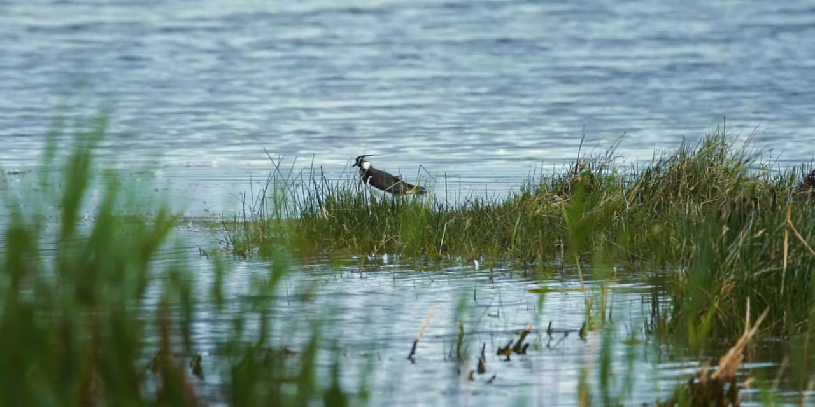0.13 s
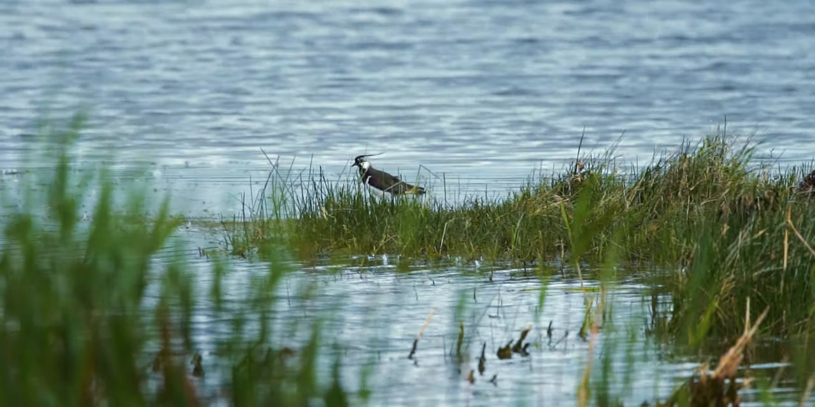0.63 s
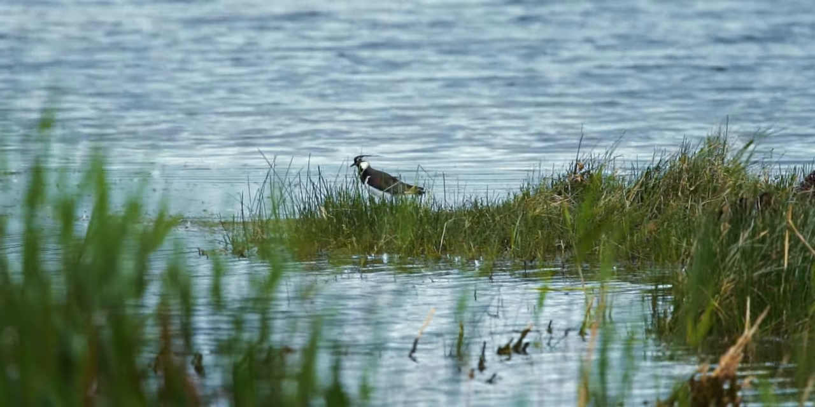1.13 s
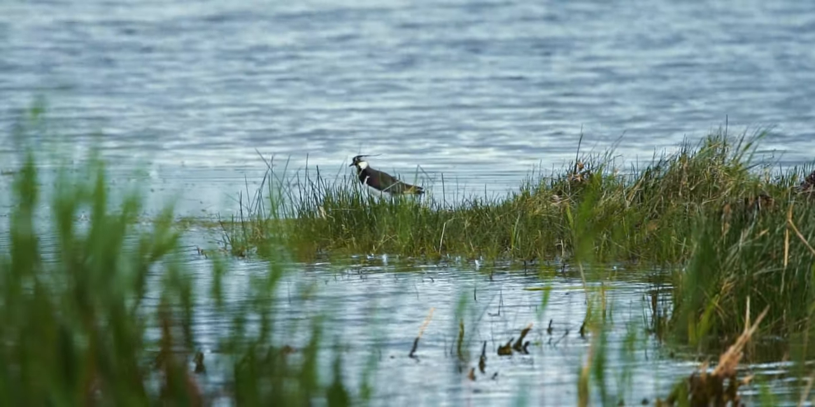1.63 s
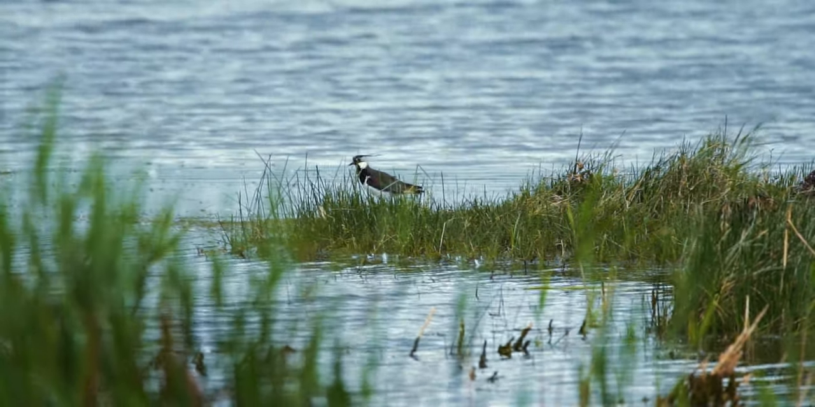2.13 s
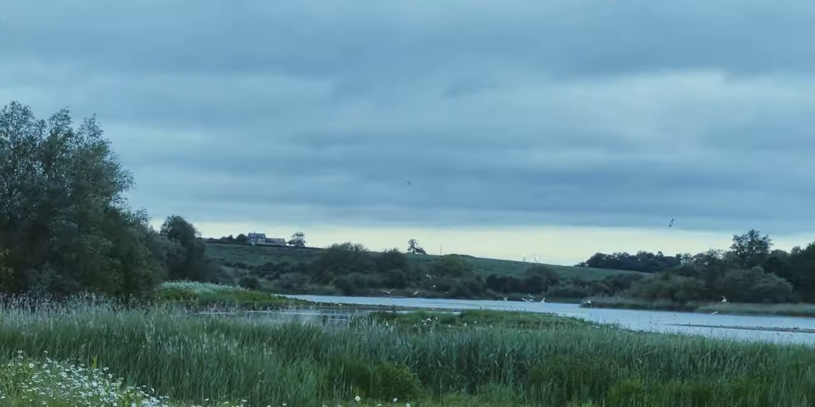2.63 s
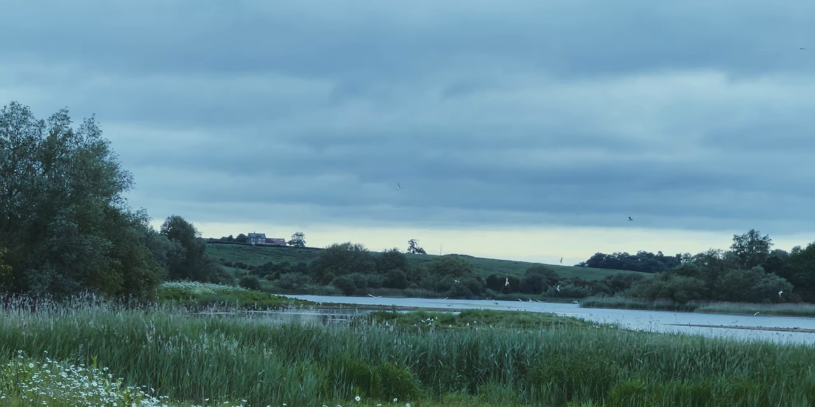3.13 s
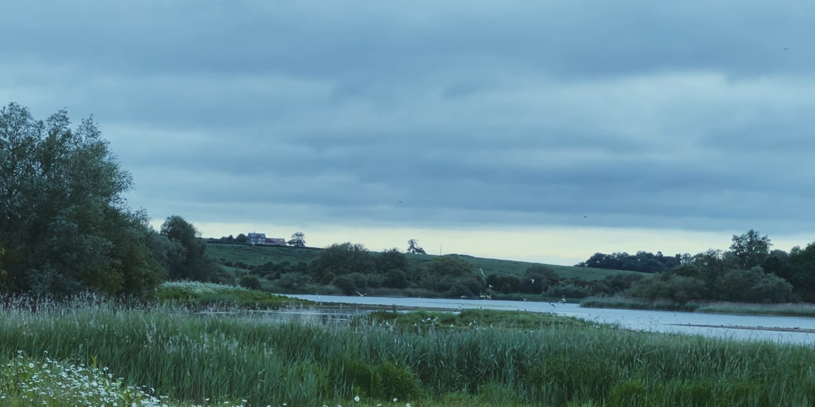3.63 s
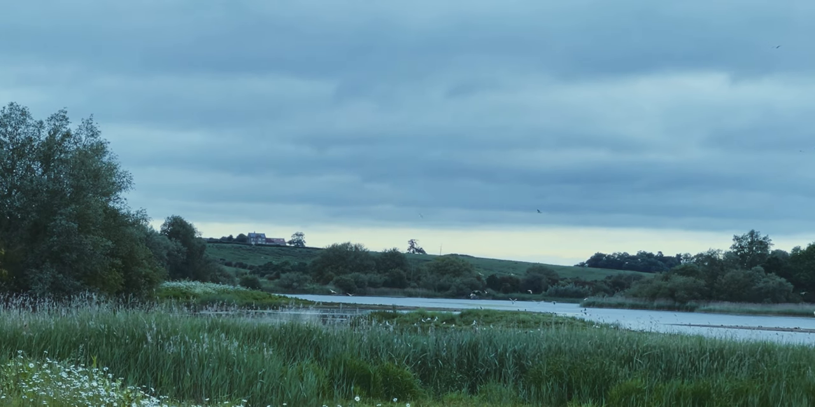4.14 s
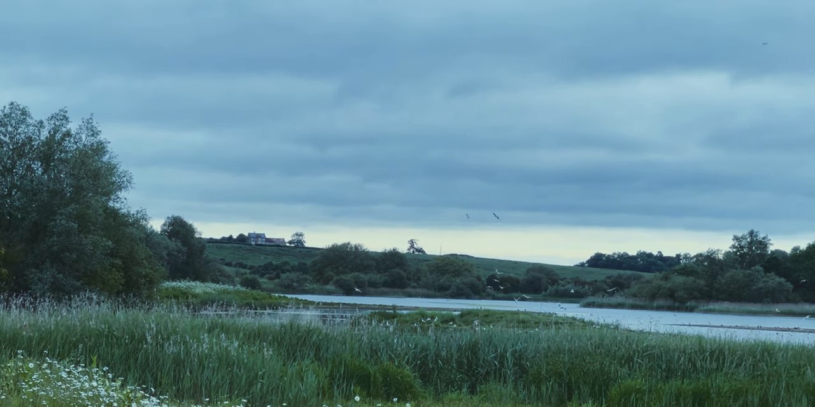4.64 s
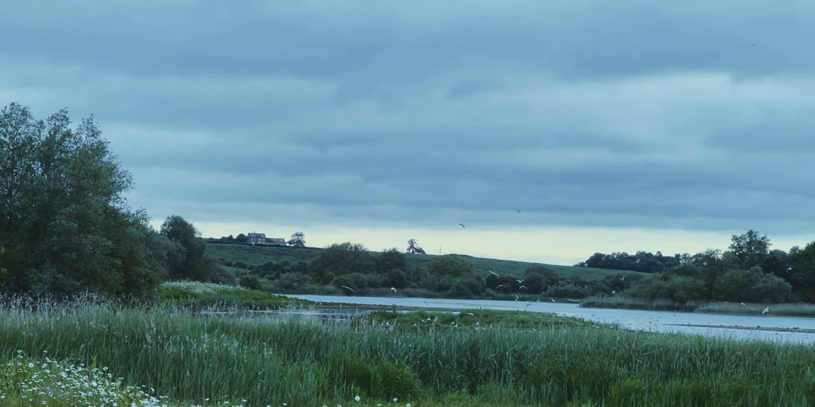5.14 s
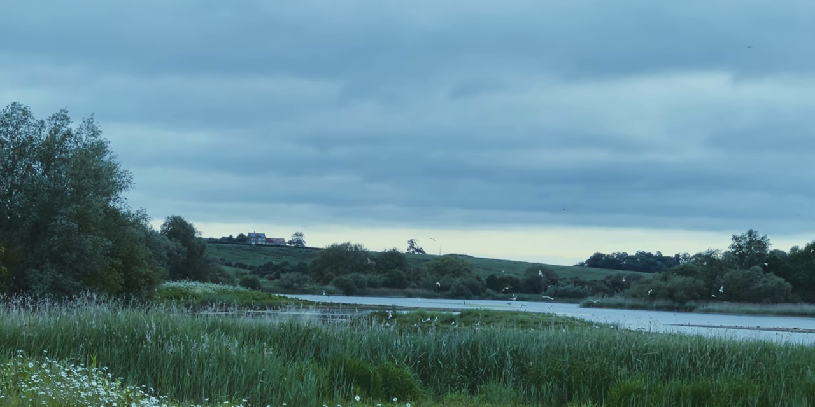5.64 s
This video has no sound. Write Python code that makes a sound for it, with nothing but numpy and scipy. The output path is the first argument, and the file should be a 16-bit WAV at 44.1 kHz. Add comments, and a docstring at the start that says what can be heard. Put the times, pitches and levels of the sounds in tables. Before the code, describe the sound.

Outdoors at a reedy lakeside, a soft steady rustle lies under a distant gull colony's raspy cries. A nearby wren begins faintly, then delivers a falling trill, a very fast rattle and a loud slower trill. Thin high seeps and warbles from other birds join in. Low gusts buffet the stereo camera microphone more in the second half.

```python
"""Breezy marsh with a singing wren

A camera's two microphone ports hear gusts, as lumps of low noise, over the steady rustle of shaped noise.
A gull colony rasps far over the water, its gliding harmonics throbbed and smeared; a treble wash is chatter.
A wren sings close by in gliding sine notes: whistles, slurs, hooks and three trills.
Other songbirds add thin seeps and warbles, sine glides that waver or buzz."""
import sys
import numpy as np
from scipy import signal
from scipy.fft import rfft, irfft
from scipy.io import wavfile
from scipy.ndimage import uniform_filter1d

SR = 44100
rng = np.random.default_rng(int(sys.argv[2]) if len(sys.argv) > 2 else 0)


def boost(x):
    """Linear amplitude factor 10**(x/20) for a level x in decibels (scalar or array-like)."""
    u = np.asarray(x, float) / 20
    return 10 ** u


def store_pcm(level_fs):
    """Save levels as 16-bit WAV."""
    pcm = np.round(np.clip(level_fs, -1, 1) * 32767).astype(np.int16)
    wavfile.write(sys.argv[1], SR, np.atleast_2d(pcm).T)


N = 254456  # samples in the scene


def walk(rate):
    """Random levels held 1 / rate s and slewed twice; spread near 1."""
    hold = max(int(SR / rate), 1)
    steps = np.repeat(rng.standard_normal(N // hold + 1), hold)
    return 1.3 * uniform_filter1d(uniform_filter1d(steps, hold), hold)[:N]


def curve(rows):
    """Gain over time through (t/s, level/dB) rows."""
    s, db = np.transpose(rows)
    return boost(np.interp(np.arange(N) / SR, s, db))


def shape(points):
    """Gain at every frequency through (f/Hz, level/dB) points, joined on a log pitch scale."""
    hz, db = np.transpose(points)
    bins_hz = np.fft.rfftfreq(N, 1 / SR)
    return boost(np.interp(np.log(bins_hz + 1), np.log(hz + 1), db))


def noise(gain):
    """Fresh noise with the given gain per frequency."""
    return irfft(rfft(rng.standard_normal(N)) * gain, N)


def unit(x):
    """Scale to rms 1."""
    return x / np.sqrt(np.mean(x ** 2))


def add(out, rows, pan_db, flutter, voice=((1, 0),), lag=0., fade=0.0037):
    """One note along (t/s, f/Hz, level/dB) rows; the left port's phase runs lag samples late.

    voice: (multiple of the pitch, level/dB); pan_db: left minus right; fade: s beyond either end."""
    s, hz, db = np.transpose(rows)
    first = max(int((s[0] - fade) * SR), 0)
    i = np.arange(first, min(int((s[-1] + fade) * SR), N))
    t = i / SR
    pitch = np.interp(t, s, hz)
    edge = np.clip(np.minimum(t - s[0], s[-1] - t) / fade + 1, 0, 1) ** 2
    size = np.sqrt(2) * boost(np.interp(t, s, db)) * edge * flutter[i]
    pan = boost(np.interp(t, s, pan_db * np.ones_like(s)) / 2)
    phase = 2 * np.pi * np.cumsum(pitch) / SR
    for side, (gain, late) in enumerate([(pan, lag), (1 / pan, 0)]):
        turn = phase - late * 2 * np.pi * pitch / SR
        tone = sum(boost(d) * np.sin(k * turn) for k, d in voice)
        out[side, i] += 2 * gain / (pan + 1 / pan) * size * tone


def note(s, length, first_hz, last_hz, db, style):
    """(t/s, f/Hz, level/dB) rows of a glide that swells to its peak and fades.

    style: (share of the length at the peak, start/dB, end/dB, bend of the glide; 1 = straight)."""
    peak, start_db, end_db, bend = style
    u = np.linspace(0, 1, num=13)
    hz = first_hz + (last_hz - first_hz) * u ** bend
    swell_db = np.interp(u, [0, np.clip(peak, .01, .99), 1], [start_db, 0, end_db])
    return np.transpose([s + length * u, hz, db + swell_db])


def echo(x, t60, gap, db, width):
    """Reeds and trees scatter sound back: a noise tail that rises over gap s, then fades 60 dB per t60 s."""
    # tint of the scattered sound: f/Hz, level/dB
    echo_colour = [(1000, 7.5), (3500, 1), (5200, -3.5), (6500, 4), (8000, 3.5)]
    t = np.arange(int(.8 * SR)) / SR
    fall = np.exp(-np.log(1000) * t / t60) * np.clip(t / gap, 0, 1)
    mid, side = rng.standard_normal((2, len(t))) * fall / np.sqrt(np.sum(fall ** 2))
    tinted = irfft(rfft(x) * shape(echo_colour), N)
    left = signal.fftconvolve(tinted[0], mid + width * side)[:N]
    right = signal.fftconvolve(tinted[1], mid - width * side)[:N]
    return boost(db) * np.array([left, right])


def air():
    """Steady rustle of reeds, water and far land: shaped noise that spreads wider as time passes."""
    # colour of the rustle: f/Hz, level/dB
    air_colour = [(80, -4), (150, -4), (270, 0), (500, -2.5), (970, -7), (1430, -10.5), (2400, -13),
                  (3450, -24.5), (5400, -38.5), (7000, -33), (9000, -36), (11000, -38.5), (13500, -41.5),
                  (16500, -42.5)]
    # its spread by pitch: f/Hz, side minus mid level/dB
    air_side = [(60, -10.5), (125, -11.5), (320, -12), (560, -5), (970, -3.5), (1690, -11), (2950, -13.5),
                (5140, -1), (8000, 0.5), (10000, 2), (15000, -11)]
    # its spread over time: t/s, gain of the side/dB
    air_width = [(0, -12), (.3, -9), (.6, -12.5), (1.5, -4.5), (3, 3.5), (5.77, 2)]
    mid = noise(shape(air_colour))
    side = noise(shape(air_colour) * shape(air_side)) * curve(air_width)
    # the level is set by the rms of the part below 1400 Hz
    hz = np.fft.rfftfreq(N, 1 / SR)
    low = irfft(rfft(mid) * (hz < 1400), N)
    level = boost(-59 + 0.83 * walk(2.796)) / np.sqrt(np.mean(low ** 2))
    return (mid + side * np.array([[1], [-1]])) * level


def wind():
    """Gusts buffet both ports nearly alike, in lumps of low noise; once there is a soft falling knock."""
    # swell of the gusts: t/s, level/dB
    gusts = [(0.0, -53.5), (0.51, -52), (0.69, -57.5), (2.52, -53), (2.67, -52), (2.89, -44.5), (3.31, -50),
             (3.39, -41.5), (3.61, -49), (3.65, -41), (3.86, -53), (3.89, -43.5), (3.97, -50), (4.0, -41.5),
             (4.19, -40), (4.53, -54.5), (5.22, -41), (5.77, -45.5)]
    # rumble of the gusts: f/Hz, level/dB
    gust_colour = [(8.8, -52), (15, 0.5), (32, -4.5), (48, -1), (145, -17), (184, -26.5), (300, -31),
                   (390, -52), (660, -120)]
    # soft low knock: t/s, f/Hz, level/dB
    thump = [(.514, 210, -62), (0.52, 159.7, -48.5), (.53, 90, -47.5), (.545, 54.7, -47), (.562, 45, -57)]
    mid = unit(noise(shape(gust_colour)))
    side = unit(noise(shape(gust_colour) * shape([(20, -6), (100, 3.5)])))
    out = curve(gusts) * (mid + boost(-27.5) * side * np.array([[1], [-1]]))
    add(out, thump, 0, np.ones(N))
    return out


def rasp(rate):
    """The rattle of a gull's throat: uneven throbs, rate per second, with breathy scatter."""
    throbs = np.sin(2 * np.pi * np.cumsum(rate * (1 + .25 * walk(25))) / SR)
    return throbs + 0.67 * walk(400)


def cry(s, length, top_hz, last_hz, db):
    """(t/s, f/Hz, level/dB) rows of an arched gull cry: up to the top, then a steepening fall."""
    top, start_ratio, bend = .25, .97, 1.2  # share of the length at the top, first pitch over top, fall bend
    rows = note(s, length, top_hz, top_hz, db, (top, -3, -5, 1))
    u = (rows[:, 0] - s) / length - top
    rise = top_hz * (1 + (1 - start_ratio) * u / top)
    fall = top_hz + (last_hz - top_hz) * np.abs(u / (1 - top)) ** bend
    return np.transpose([rows[:, 0], np.where(u < 0, rise, fall), rows[:, 2]])


def gulls(count=130):
    """Near cries over a crowd of overlapping arched cries, all rasping and smeared by distance."""
    # near cries: t/s, length/s, top f/Hz and last f/Hz of the second harmonic, peak level/dB, roughness 0-1
    near_cries = [(.18, 0.0735, 2300, 2100, -60.5, .25), (.255, .225, 1932, 1840, -59.5, 0.23),
                  (.62, 0.075, 2150, 2110, -63, .66), (1.08, 0.094, 1956, 1940, -62, .5),
                  (1.08, .1, 2300, 2270, -58.5, .7), (1.28, .22, 2310, 2300, -59, 0.83),
                  (1.63, .07, 2268, 2250, -55, .95), (1.73, 0.17, 2193, 1760, -51, 0.25),
                  (1.88, 0.21, 2158, 1885, -56, .95), (2.24, 0.19, 2193, 1835, -48.5, 0.9),
                  (2.48, .14, 2170, 1877, -45.5, 0.67), (2.72, .13, 1990, 1920, -48.5, 0.83),
                  (3.05, 0.086, 2210, 1920, -51.5, 0.74), (3.25, 0.11, 2212, 1870, -47.5, .95),
                  (3.35, 0.15, 1931, 1876, -52, .95), (3.61, 0.13, 2239, 1946, -43, 0.39),
                  (4.0, .22, 2748, 2537, -52, 0.71), (4.01, .11, 2270, 2033, -47.5, .95),
                  (4.14, 0.1, 2025, 1936, -50.5, .95), (4.45, .17, 2127, 1894, -44, 1),
                  (4.89, 0.1, 2330, 2254, -48.5, 0.11), (4.98, 0.17, 2023, 1710, -50, 0.38),
                  (5.27, .06, 2122, 2080, -54.5, 0.52), (5.45, 0.15, 2154, 1947, -50, 0.95)]
    # far colony: t/s, level/dB, middle f/Hz
    colony = [(0.0, -60, 2045), (0.36, -67, 1990), (0.741, -60.5, 1988), (1.46, -54.5, 2226),
              (1.54, -62, 1930), (1.669, -52.5, 2103), (2.3, -55, 2031), (2.449, -49.5, 2012),
              (3.132, -50.5, 1994), (3.541, -56.5, 1854), (3.649, -50, 2210), (3.859, -52, 1956),
              (4.029, -49.5, 2116), (4.261, -54.5, 1938), (4.51, -51, 2020), (4.978, -50.5, 2094),
              (5.3, -56.5, 1959), (5.77, -48.5, 2090)]
    # partials of a cry: multiple of the fundamental, level/dB
    gull_voice = [(1.002, -21), (1.5, -18), (2, -2), (2.55, -14), (3, -27.5), (3.998, -21)]
    # colour of the breath: f/Hz, level/dB
    gull_breath = [(1000, -21), (1500, -7.5), (2800, 10.5), (4000, -21), (6500, -5), (9000, -12.5),
                   (11000, -50)]
    near, crowd = np.zeros((2, N)), np.zeros((2, N))
    voice = [(k / 2, db) for k, db in gull_voice]  # cry pitches are those of the second harmonic
    throats = [rasp(rate) for rate in (85., 110., 135.)]
    for k, (*row, rough) in enumerate(near_cries):
        rattle = (1 + rough * throats[k % len(throats)]) / np.hypot(1, rough)
        add(near, cry(*row), -0.5, rattle, voice, lag=1.5, fade=.015)
    # air rushing past the throat: noise that swells with each near cry
    swell = uniform_filter1d(np.abs(near), size=300)
    near += boost(-12) * swell * unit(noise(shape(gull_breath)))

    s, level_db, centre_hz = np.transpose(colony)
    for k, (when, tone, length, loud, pan) in enumerate(rng.random((count, 5))):
        t = (k + when) * N / SR / count - .1
        span = .1 + .15 * length
        hz = np.interp(t + span / 2, s, centre_hz) * (1 + .32 * (tone - .5))
        rows = np.array([(t, .96 * hz, -5), (t + 0.3015 * span, 1.04 * hz, 0), (t + span, .9 * hz, -6)])
        rows = rows - [0, 0, 5 * loud]
        rattle = 1 + 1.03 * throats[k % len(throats)]
        # cries come from along the whole shore, so each reaches the ports with its own lag
        lag = 1.04 + 2.4 * (pan - .5)
        add(crowd, rows, 4 * (pan - .5), rattle, voice, lag=lag, fade=.02)
    crowd = unit(crowd + echo(crowd, t60=0.93, gap=0.0053, db=-7.0, width=0.4))
    crowd = crowd * curve(np.transpose([s, level_db]))
    return near + echo(near, t60=0.3, gap=0.0038, db=-7.0, width=0.19) + crowd


def chatter():
    """Songbirds too far to tell apart: a patchy treble wash of shaped noise."""
    # swell of the wash: t/s, level/dB
    chatter_level = [(0.0, -75), (0.95, -72.5), (1.8, -62.5), (2.15, -70.5), (2.54, -58.5), (3.18, -62.5),
                     (3.39, -57), (3.5, -62), (4.19, -66), (4.5, -58), (4.81, -64), (5.05, -58.5),
                     (5.3, -69.5), (5.43, -65), (5.77, -64)]
    # its colour: f/Hz, level/dB
    chatter_colour = [(2000, -5), (2800, 4), (4000, 2.5), (5200, 5.5), (6500, -4.5), (8000, -13),
                      (10000, -39), (12000, -57.5)]
    mid, side = (unit(noise(shape(chatter_colour))) * boost(1.5 * walk(12)) for _ in range(2))
    tilt = boost(np.array([[-1], [1]]) * 0.5)  # the right port is 1 dB louder
    return curve(chatter_level) * (tilt * mid + 0.73 * side * np.array([[1], [-1]]))


def shade(rows):
    """Left minus right dB at each (t/s, f/Hz, ..) row: the camera body shades the left port from the wren."""
    # shading by pitch: f/Hz, left minus right level/dB
    wren_shade = [(4200, -6.5), (5200, -1), (5900, -7), (6500, -3), (7300, -9), (8300, -6)]
    return np.interp(np.transpose(rows)[1], *np.transpose(wren_shade))


def trill(parts, rhythm, level_db, flutter, count):
    """One syllable repeated with slight change; every second one may come early.

    rhythm: (first t/s, period/s, early/s); level_db: (first, last)."""
    out = np.zeros((2, N))
    first, period, early = rhythm
    levels = np.linspace(*level_db, count)
    for k, (peak_db, (tune, loud)) in enumerate(zip(levels, rng.standard_normal((count, 2)))):
        start = first + k * period - early * (k % 2)
        for s, hz, db in map(np.transpose, parts):
            rows = np.transpose([start + s, hz * (1 + .004 * tune), peak_db + 1.2 * loud + db])
            pan_db = shade(np.transpose([s, hz]))
            add(out, rows, pan_db, flutter, lag=1.1, fade=.0015)
    return out


def wren():
    """Clean sine glides: scoops, whistles, slurs, hooks and three trills, with a scattered echo."""
    # gliding notes: t/s, length/s, first f/Hz, last f/Hz, peak level/dB; scoops near their pitch early
    scoops = [(.215, .045, 6100, 6490, -65), (.39, .07, 7000, 7670, -65), (.543, 0.098, 5530, 5310, -47.5),
              (2.645, .06, 5600, 6370, -42.5)]
    whistles = [(2.705, .05, 6350, 6200, -50), (0, .058, 7600, 6770, -68.5), (.097, 0.053, 5520, 5900, -65),
                (2.51, .038, 5270, 4950, -32.5), (4.095, .068, 6740, 5540, -40.5),
                (4.424, .075, 5300, 4870, -32), (4.505, 0.043, 4893, 4890, -44)]
    slurs = [(.46, .03, 7700, 7100, -65.5), (.292, .06, 5740, 4100, -52), (.832, 0.057, 5440, 4140, -45),
             (2.548, .036, 4830, 3910, -38), (4.163, 0.036, 5500, 3850, -35)]
    # hooks, a flick up and down into a held note: t/s of the dip, flick/s, held/s, held f/Hz, level/dB
    hooks = [(.715, .015, 0.062, 7620, -61.5), (1.93, 0.019, 0.12, 7480, -52),
             (2.433, 0.0092, .043, 7280, -47.5), (3.269, 0.023, 0.011, 7590, -47)]
    # outline of a hook: flicks from the dip, multiple of the held pitch, relative level/dB
    hook_outline = [(-1.8, .96, -12), (-1.01, 1.12, -10), (0, .968, 0), (1.1, 1.005, -6.5)]
    # trill syllables: t/s from the syllable's mark, f/Hz, relative level/dB
    fall = [(-.037, 7100, -12), (-.03, 7200, -17.5), (-.017, 6550, -12.5), (-.008, 5800, -6), (0, 5180, 0),
            (.01, 4300, -10.5), (.019, 4160, -12.5)]
    tick = [(-.003, 7300, -18), (-.0012, 6100, -4), (0, 5400, 0), (.0012, 4900, -7)]
    pickup = [(-.056, 4500, -14), (-.05, 4590, -11.5), (-.043, 4540, -19)]
    rise = [(-.018, 4800, -16.5), (-.008, 5013, 0), (0, 5216, 1), (.008, 5860, -9), (.024, 6310, -11),
            (.031, 6420, -23)]
    after = [(.06, 6530, -23), (.075, 6480, -21), (.095, 6490, -29.5)]
    # swell of each trill: first level/dB, last level/dB
    trill_db = [(-49.5, -41.5), (-48, -45.5), (-35.5, -35.5)]

    out, flutter = np.zeros((2, N)), boost(1.4 * walk(200))
    notes = [note(*row, (1, -5.5, -11, .22)) for row in scoops]
    notes += [note(*row, (0.32, -9, -9, 0.9)) for row in whistles]
    notes += [note(*row, (.5, -11, -14, 1.9)) for row in slurs]
    for s, flick, held, hz, db in hooks:
        rows = [(s + flick * k, hz * ratio, db + d) for k, ratio, d in hook_outline]
        end = (rows[-1][0] + held, hz * 0.97, db - 9)  # the held note sags and fades
        notes.append(rows + [end])
    for rows in notes:
        add(out, rows, shade(rows), flutter, lag=1.3)
    out += trill([fall], (.9612, .088, 0), trill_db[0], flutter, count=11)
    out += trill([tick], (2.7652, .029, .0018), trill_db[1], flutter, count=16)
    out += trill([pickup, rise, after], (3.3625, .1617, 0), trill_db[2], flutter, count=5)
    return out + echo(out, t60=0.33, gap=0.0033, db=-7.0, width=0.49)


def songbirds():
    """Further off, so moving air and leaves make the notes waver; some are buzzy."""
    # thin seeps: t/s, length/s, first f/Hz, last f/Hz, peak level/dB, left minus right level/dB
    seeps = [(1.3, 0.4, 8080, 7580, -68, -2), (3.172, 0.24, 8050, 7500, -54.5, -2),
             (3.971, 0.21, 7890, 7560, -62.5, 3), (3.962, 0.13, 7120, 6800, -70, 2),
             (4.603, 0.016, 8840, 8150, -59.5, -6), (4.612, 0.24, 8060, 7450, -49.5, -6),
             (5.507, 0.39, 7935, 7550, -56.5, -0.5), (5.505, .09, 7260, 7050, -64.5, -14)]
    # six warbling birds: left minus right level/dB, roughness 0-1.5,
    # notes [(t/s, length/s, first f/Hz, last f/Hz, peak level/dB), ..]
    warbles = [(-10, 0.13, [(2.126, .056, 3740, 3765, -52), (2.192, 0.021, 4010, 4390, -51),
               (2.28, .065, 3600, 3745, -54), (2.352, 0.022, 3960, 4200, -51.5),
               (2.592, 0.0094, 3730, 3800, -54), (4.872, 0.064, 4220, 3600, -49.5),
               (5.715, 0.046, 3310, 3345, -51.5)]), (6.5, .45, [(2.07, 0.11, 3310, 3110, -65.5),
               (3.03, .013, 2990, 3080, -52), (3.35, 0.038, 3100, 2860, -59),
               (3.78, 0.057, 2660, 2640, -59)]), (-6.5, 0.61, [(2.98, 0.029, 4740, 4320, -56),
               (3.97, 0.14, 3440, 3960, -60), (4.23, 0.12, 3770, 3420, -58),
               (4.25, 0.15, 5880, 5160, -62.5), (3.72, 0.11, 4140, 3530, -66),
               (4.97, .045, 4620, 4650, -53), (5.02, .1, 4800, 4550, -58), (4.46, .1, 4200, 4050, -60),
               (5.69, 0.058, 4900, 4980, -59.5)]), (-4, 0.66, [(2.882, .02, 4080, 4040, -58),
               (4.8, 0.059, 3830, 4080, -54), (5.005, 0.063, 3530, 3090, -52),
               (5.252, .012, 5900, 4650, -49), (5.262, .022, 4650, 4080, -49),
               (5.285, .06, 4090, 4040, -49), (5.315, 0.072, 4520, 4600, -51),
               (5.36, 0.095, 4035, 4050, -59.5), (5.425, 0.059, 3170, 3380, -54)]),
               (-6.5, 1.27, [(4.89, 0.053, 5900, 5640, -57.5), (4.89, 0.044, 6800, 6350, -60.5),
               (5.24, .04, 5900, 5750, -56.5)]), (-4, 0.24, [(5.52, 0.031, 3464, 3620, -51),
               (5.555, 0.026, 3590, 3460, -45.5), (5.58, 0.053, 3510, 3830, -47),
               (5.635, 0.041, 3790, 3715, -53)])]
    out, waver, buzz = np.zeros((2, N)), walk(400), walk(1100)
    patchy = walk(70)  # rough voices also break up
    for *row, pan_db in seeps:
        rows = note(*row, (-0.12, -10, -17, 0.63))
        add(out, rows, pan_db, 1 + .7 * waver, lag=.4, fade=.008)
    for pan_db, rough, bird_notes in warbles:
        for row in bird_notes:
            rows = note(*row, (.3, -3, -7, 0.85))
            flutter = boost(3.5 * rough * patchy) * (1 + rough * buzz) / np.hypot(1, rough)
            add(out, rows, pan_db, flutter, lag=2.3, fade=0.0082)
    return out + echo(out, t60=0.23, gap=0.0026, db=-5.0, width=1.0)


def scene():
    """All the marsh: rustle, gusts, gulls, far chatter, wren and songbirds."""
    return air() + wind() + gulls() + chatter() + wren() + songbirds()


def top_cut(x):
    """Nothing passes above the cut-off."""
    return signal.sosfilt(signal.butter(12, 15720, fs=SR, output="sos"), x)


def record(dry):
    """The finished mix as the camera stores it."""
    return top_cut(dry)


dry = scene()
out = record(dry)
store_pcm(out)
```